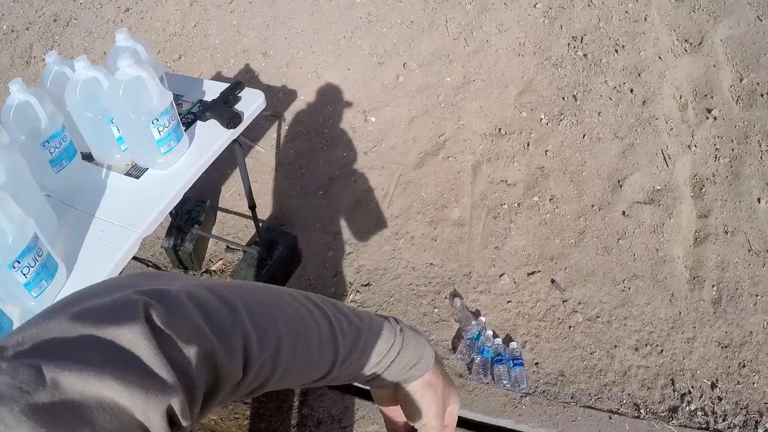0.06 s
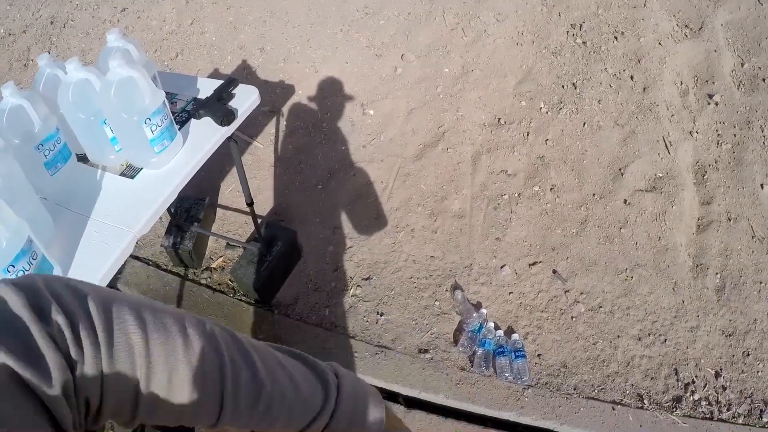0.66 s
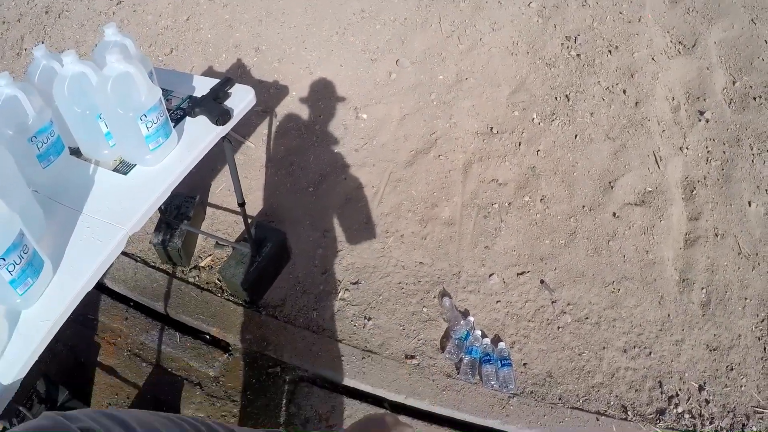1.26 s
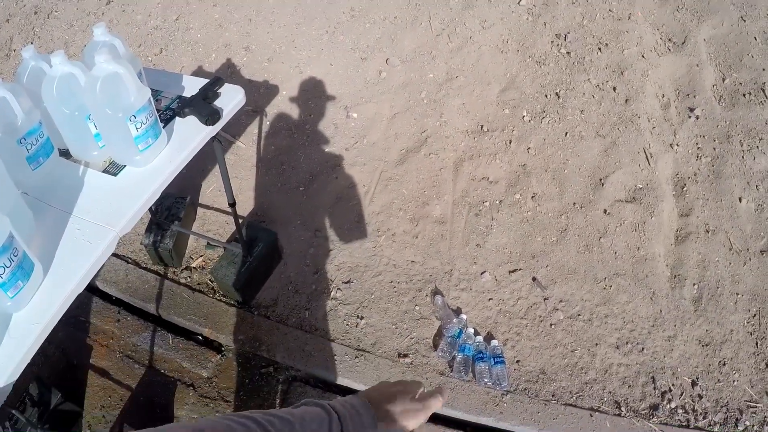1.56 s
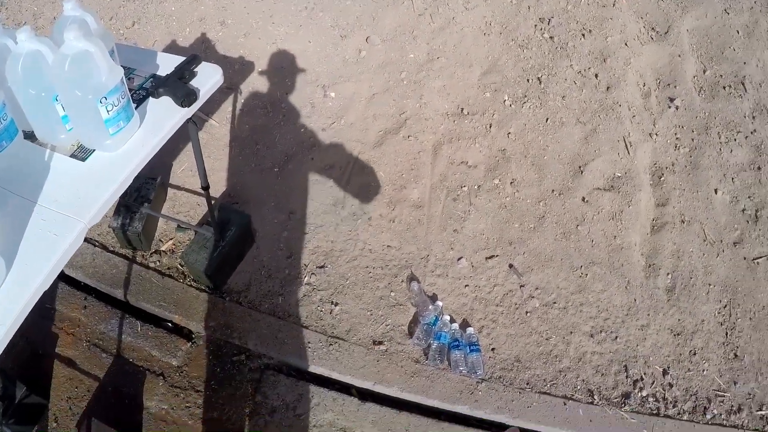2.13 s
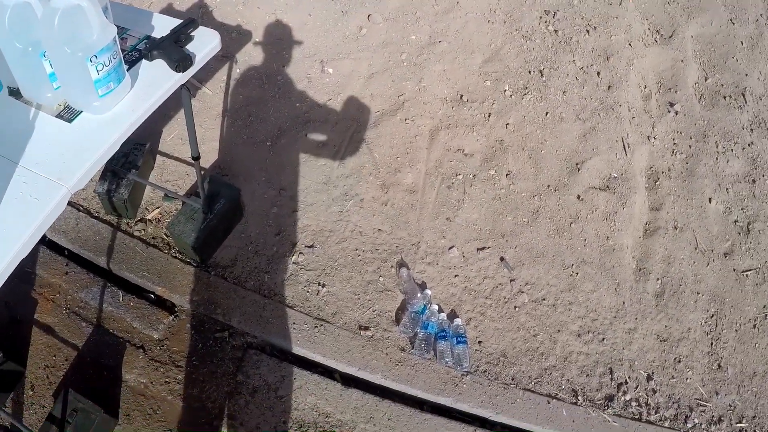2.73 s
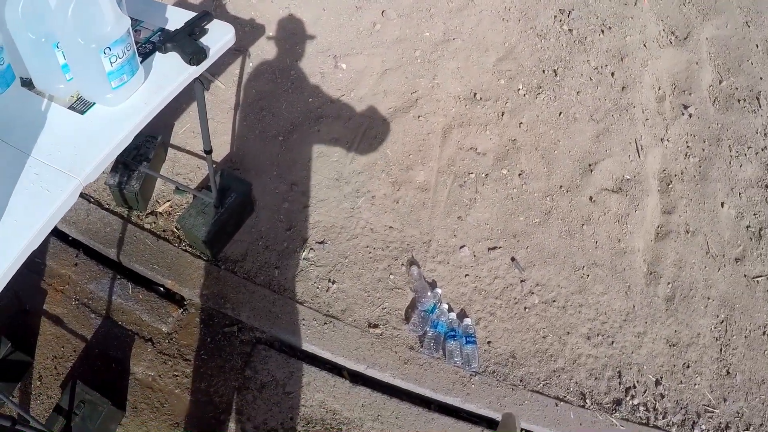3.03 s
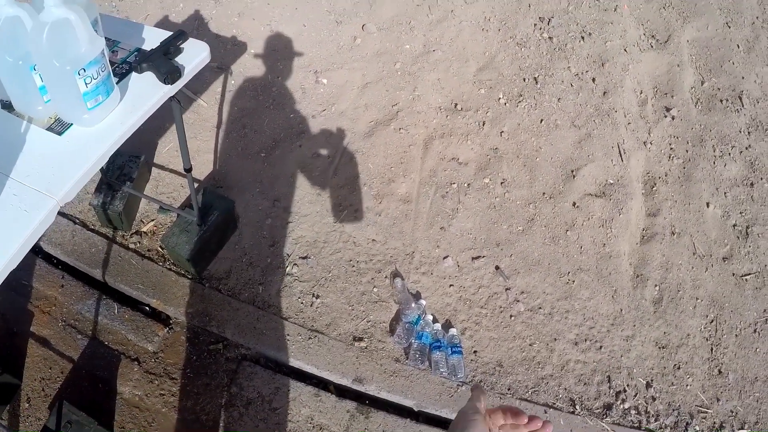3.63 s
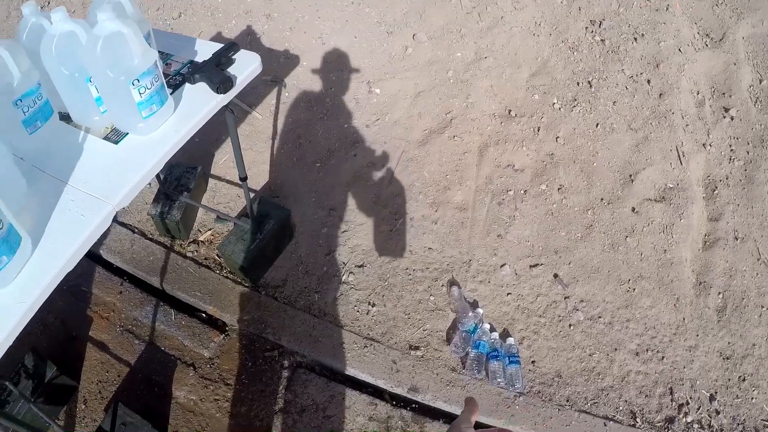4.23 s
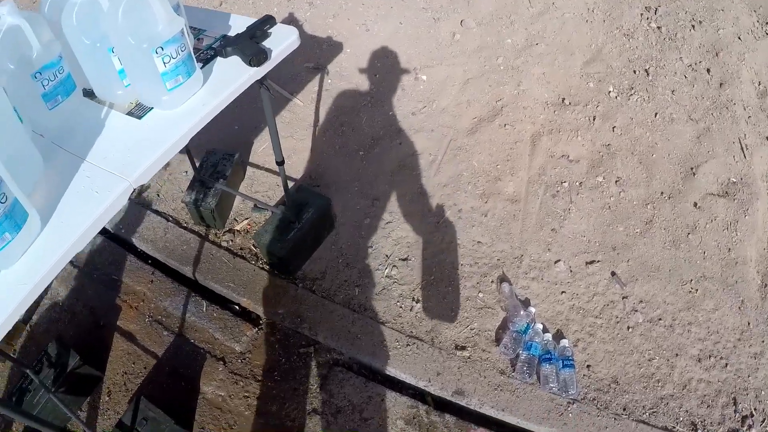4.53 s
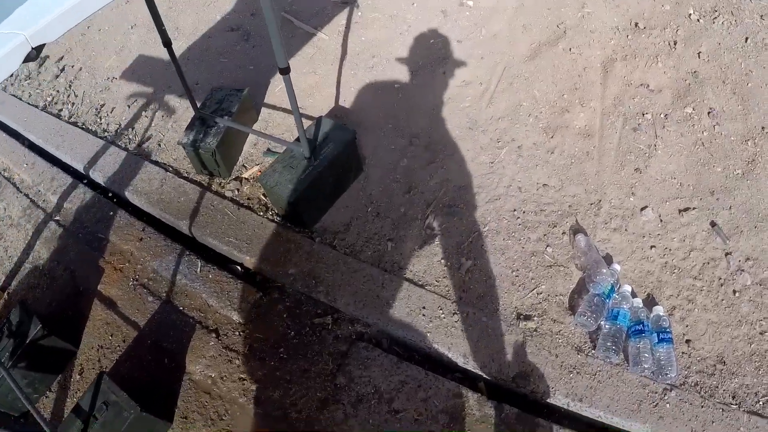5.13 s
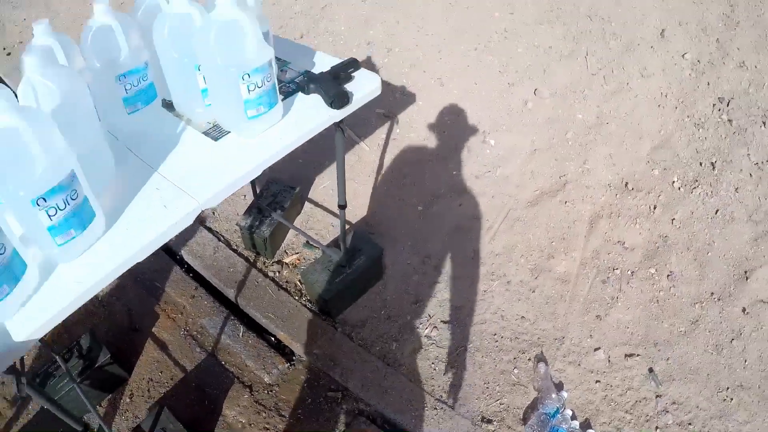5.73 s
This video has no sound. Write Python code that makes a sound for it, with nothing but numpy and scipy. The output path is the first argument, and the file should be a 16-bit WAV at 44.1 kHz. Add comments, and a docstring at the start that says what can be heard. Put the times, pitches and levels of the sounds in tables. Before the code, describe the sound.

A thin plastic water jug crackles, knocks and sloshes as it is handled, with two short splashes over a faint engine hum.

```python
"""Emptying a plastic jug

A thin plastic water jug is picked up, tipped out and put down outdoors, close to a body-worn microphone.
Its walls knock under blows and crackle as creases snap through. Air pockets ring in the last water as it
sloshes in the hollow body and splashes out. Sleeves rustle, grit crunches, an engine idles some way off."""
import sys
import numpy as np
from scipy import signal
from scipy.fft import rfft, irfft, next_fast_len
from scipy.io import wavfile
from scipy.ndimage import uniform_filter1d

SR = 44100
rng = np.random.default_rng(int(sys.argv[2]) if len(sys.argv) > 2 else 0)


def store_wav(level_fs):
    """Save 16-bit WAV to argv[1]."""
    pcm = np.round(np.clip(np.atleast_2d(level_fs), -1, 1) * 32767)
    wavfile.write(sys.argv[1], SR, pcm.T.astype(np.int16))


N = 263718
TIME = np.arange(N) / SR
# air and wall modes of the jug: (pitch [Hz], level [dB], t60 [s])
JUG_MODES = [(310, -6, 0.17), (374, -7, 0.13), (453, -1.5, 0.16), (489, -4, 0.13), (620, -2, 0.11),
             (715, -9, 0.049), (965, -11, 0.09), (1127, -7, 0.046), (1350, 1, 0.032), (1575, -7, 0.048)]


def from_db(db):
    """Decibels to gain."""
    return 10 ** (np.asarray(db) / 20)


def rms_one(x):
    """Scale to rms 1."""
    return x / np.sqrt(np.mean(x ** 2) + 1e-20)


def even(x, window_s):
    """Hold the short-term rms at 1."""
    power = uniform_filter1d(x ** 2, max(int(window_s * SR), 2))
    return x / np.sqrt(np.abs(power) + 1e-12)


def automation(rows):
    """One curve per value column, drawn through timed breakpoints."""
    times, *columns = np.transpose(rows)
    return [np.interp(TIME, times, column) for column in columns]


def add(track, s, sound):
    """Mix a sound into a track at time s."""
    start = max(round(s * SR), 0)
    track[start:start + len(sound)] += sound[:len(track) - start]


def coloured(x, spectrum):
    """Shape a steady signal with an EQ curve, rolled off below its first point; rms 1."""
    hz, db = np.transpose(spectrum)
    size = next_fast_len(N)
    log_hz = np.log(np.maximum(np.fft.rfftfreq(size, 1 / SR), 1))
    low_cut = np.minimum(np.exp(log_hz) / hz[0], 1) ** 2
    eq = from_db(np.interp(log_hz, np.log(hz), db))
    return rms_one(irfft(rfft(x, size) * low_cut * eq, size)[..., :N])


def drift(per_s):
    """A random wander through points of spread 1."""
    knots = rng.standard_normal(2000)
    return np.interp(TIME * per_s, np.arange(len(knots)), knots)


def grains(per_s, spread_db):
    """Random clicks of very uneven size."""
    sizes = from_db(spread_db * np.minimum(rng.exponential(1, N), 4)) * rng.choice([-1, 1], N)
    return sizes * (rng.random(N) < per_s / SR)


def swell(rise_s, t60):
    """An envelope with a linear attack and an exponential decay."""
    t = TIME[:int((rise_s + t60) * SR)]
    return np.minimum(t / rise_s, 1) * from_db(-60 * np.maximum(t - rise_s, 0) / t60)


def ring(hz, t60, rise_cycles):
    """A damped swing at one pitch."""
    envelope = swell(rise_cycles / hz, t60)
    return envelope * np.sin(2 * np.pi * hz * TIME[:len(envelope)])


def snap(hz, rise_cycles):
    """A short packet of cycles that swells smoothly and dies."""
    rise_s = max(rise_cycles, .3) / hz
    t = TIME[:int(10 * rise_s * SR)]
    envelope = (t / rise_s * np.exp(1 - t / rise_s)) ** 2
    return envelope * np.sin(2 * np.pi * min(hz, SR / 3) * t)


def pings(count, centre_hz, spread_octaves, rise_cycles, spread_db):
    """Little rings in random bunches, each with its own pitch and size; rms 1."""
    out, duration = np.zeros(N), N / SR
    bunching_s = 0.05 * drift(per_s=11)
    for k, (when, pitch, size, length) in enumerate(rng.random((count, 4))):
        s = (k + when) / count * duration
        hz = centre_hz * 2 ** (spread_octaves * np.arcsin(2 * pitch - 1))
        ping = from_db(spread_db * size ** 2) * snap(hz, rise_cycles * (.5 + length))
        add(out, (s + bunching_s[int(s * SR)]) % duration, ping)
    return rms_one(out)


def bursts(cues, spectrum, rise_share):
    """Swells of dense tiny impacts; each attack lasts a share of its decay time."""
    crackle = even(coloured(grains(per_s=13000, spread_db=4.5), spectrum), window_s=0.004)
    level = np.zeros(N)
    for s, db, t60 in cues:
        add(level, s, from_db(db) * swell(rise_share * t60, t60))
    return crackle * level


def scatter(x, t60, low_hz, high_hz):
    """A tail of dense short echoes, near unity gain within its band."""
    envelope = swell(0.00081, t60)
    band = signal.butter(2, [low_hz, high_hz], "band", fs=SR, output="sos")
    noise = even(signal.sosfilt(band, rng.standard_normal(SR)), window_s=0.00064)
    echoes = noise[:len(envelope)] * envelope
    band_share = 2 * (high_hz - low_hz) / SR
    return signal.fftconvolve(x, echoes * np.sqrt(band_share / np.sum(echoes ** 2)))[:N]


def wall_colour(x, dip_hz=3970, dip_mix=0.31, top_hz=14000):
    """The wall radiates poorly between its two bright resonances, and its top end is soft."""
    notched = signal.lfilter(*signal.iirnotch(dip_hz, Q=7, fs=SR), x + 1e-18)
    lowpass = signal.butter(3, top_hz, fs=SR, output="sos")
    return signal.sosfilt(lowpass, dip_mix * notched + (1 - dip_mix) * x)


def movement():
    """Arms and feet move: cloth and plastic crinkle and rub, water blips faintly, grit crunches."""
    # moves of the body: (time [s], rustle level [dB], rubbing level [dB])
    moves = [(0.0, -71, -61.5), (0.77, -60.5, -56), (1.45, -66, -61.5), (1.73, -52.5, -51.5),
             (1.96, -68.5, -65), (2.22, -59.5, -59), (2.34, -53, -49), (2.56, -55.5, -54.5),
             (2.75, -56.5, -54.5), (3.01, -55.5, -51), (3.4, -61, -58), (3.78, -57, -53.5),
             (3.95, -52, -56.5), (4.1, -52.5, -55.5), (4.17, -59.5, -56.5), (4.44, -49, -57.5),
             (4.6, -56.5, -57), (4.76, -57.5, -59.5), (4.9, -57.5, -58.5), (4.97, -52, -55.5),
             (5.11, -52, -56.5), (5.38, -49.5, -53.5), (5.53, -54, -56), (5.65, -51.5, -55),
             (5.98, -52, -56.5)]
    # grit underfoot: (time [s], level [dB])
    footing = [(0.0, -77), (0.6, -65), (1.2, -70), (2.1, -79), (3.3, -82), (3.9, -73.5), (4.9, -65),
               (5.3, -60.5), (5.98, -83)]
    # bright rustle: (frequency [Hz], level [dB])
    rustle_eq = [(900, -36), (2100, -11), (3100, 1), (4000, -5), (5200, 2), (6300, -0.5), (7300, -4.5),
                 (10000, -11.5), (13000, -21), (15500, -29)]
    # dull rubbing: (frequency [Hz], level [dB])
    rubbing_eq = [(120, -8.5), (220, 8), (330, 6), (600, 2.5), (900, -1.5), (1400, -3), (2000, -14.5),
                  (3500, -18), (8000, -82)]
    rustle_db, rubbing_db = automation(moves)
    grit_db, = automation(footing)
    flutter_db = 3.7 * drift(per_s=140) + 0.53 * drift(per_s=22)
    cloth = from_db(flutter_db - 3.5) * coloured(grains(per_s=7000, spread_db=4.5), rustle_eq)
    crinkles = from_db(-8) * pings(420, centre_hz=5400, spread_octaves=0.35, rise_cycles=1.6, spread_db=12)
    grit = pings(170, centre_hz=9200, spread_octaves=0.4, rise_cycles=1.1, spread_db=20)
    shiver = from_db(1) * scatter(crinkles, t60=0.007, low_hz=2650, high_hz=8300)
    judder_db = 5.8 * np.tanh(drift(per_s=40))
    rubbing = from_db(judder_db - 3) * coloured(grains(per_s=2000, spread_db=4), rubbing_eq)
    blips = from_db(-10) * pings(380, centre_hz=850, spread_octaves=0.55, rise_cycles=1, spread_db=9)
    bright = from_db(rustle_db - 0.84) * (cloth + crinkles + shiver)
    dull = from_db(rubbing_db + 1.6) * (rubbing + blips)
    return bright + dull + from_db(grit_db + 1) * wall_colour(grit)


def engine(firing_hz=82.3):
    """A distant idle: only its lowest orders carry this far."""
    # loudness of the idle: (time [s], level [dB])
    fader = [(0.0, -55), (0.12, -52.5), (1.65, -61), (3.57, -52.5), (5.1, -52.5), (5.5, -50.5)]
    # engine orders: (multiple of the firing rate [ratio], level [dB])
    orders = [(3 / 4, -9), (0.99, 0), (2, -18.5)]
    level_db, = automation(fader)
    wavering_hz = firing_hz * (1 + 0.0019 * drift(per_s=2.68))
    phase = 2 * np.pi * np.cumsum(wavering_hz) / SR
    hum = sum(from_db(db + 0.5 * drift(per_s=7.1)) * np.sin(k * phase) for k, db in orders)
    return from_db(level_db) * np.sqrt(2) * hum


def outdoor_air():
    """A steady bed of open air, mostly low rumble."""
    # ambience: (frequency [Hz], level [dB])
    air_eq = [(20, 3.5), (40, -1), (70, 3), (120, -7), (220, -21.5), (600, -19.5), (1400, -28.5),
              (2500, -95), (6000, -38.5), (12000, -36.5), (15000, -40)]
    return from_db(-57) * coloured(rng.standard_normal(N), air_eq)


def port_hiss():
    """Each of the two microphone ports has its own faint hiss."""
    # self-noise: (frequency [Hz], level [dB])
    hiss_eq = [(100, 7.5), (1000, -3.5), (3000, -3), (6000, -4), (12000, -8.5), (14500, -10.5)]
    return from_db(-69) * coloured(rng.standard_normal((2, N)), hiss_eq)


def scuffs():
    """Hand, sleeve and ground brush in gritty strokes."""
    # strokes: (time [s], level [dB], t60 [s])
    strokes = [(0.025, -52.5, 0.073), (0.1, -59, 0.21), (0.353, -47.5, 0.058), (0.42, -56.5, 0.6),
               (1.043, -52, 0.12), (0.77, -55.5, 0.49), (1.141, -47, 0.088), (1.175, -53, 0.2),
               (2.269, -43.5, 0.074), (2.301, -47, 0.26), (2.417, -45, 0.1), (2.822, -51, 0.11),
               (2.976, -44, 0.11), (3.946, -46, 0.056), (4.01, -43, 0.047), (4.538, -47.5, 0.12),
               (4.985, -50, 0.18), (5.332, -43, 0.24), (5.539, -40, 0.45)]
    # midrange rasp: (frequency [Hz], level [dB])
    scuff_eq = [(300, -31), (650, 6), (1000, 5.5), (1400, 10), (1700, -8.5), (2200, -7), (3200, -4),
                (6000, -14), (12000, -45)]
    return bursts(strokes, scuff_eq, rise_share=0.017)


def sprays():
    """Splashing water, scraped plastic and crunching grit throw off short sprays of crackle."""
    # sprays: (time [s], level [dB], t60 [s])
    cues = [(0.026, -55, 0.042), (1.492, -41.5, 0.05), (1.609, -38.5, 0.12), (1.669, -23, 0.035),
            (2.299, -41, 0.035), (2.411, -40.5, 0.035), (2.421, -36, 0.021), (2.635, -34.5, 0.098),
            (2.81, -42.5, 0.029), (2.968, -37, 0.065), (3.0795, -35.5, 0.031), (5.332, -23.5, 0.05),
            (5.3385, -25, 0.062), (5.358, -37, 0.19), (5.409, -31.5, 0.1), (5.538, -38.5, 0.051),
            (5.558, -39.5, 0.084), (5.59, -45, 0.083), (5.613, -44, 0.038), (5.682, -42, 0.19),
            (5.712, -45, 0.083), (5.749, -41.5, 0.028), (5.948, -44.5, 0.094)]
    # bright crackle: (frequency [Hz], level [dB])
    crackle_eq = [(600, -1), (1400, -7), (2100, -10), (3000, 2), (4000, -5), (5000, 2), (6100, 0),
                  (7000, -9), (9500, -17.5), (13000, -27.5), (15500, -44)]
    return bursts(cues, crackle_eq, rise_share=0.072)


def crease_snaps(crack_hz=9200, step_s=0.0014, step_loss_db=15.5):
    """A crease snaps through with a few bright cycles and a crack, then settles in weaker, uneven steps."""
    # snaps of buckling plastic and of grit: (time [s], level [dB], pitch [Hz], attack [cycles])
    cues = [(0.253, -43.5, 5570, 1.8), (0.266, -47, 5400, 1.4), (0.289, -50, 5170, 2.8),
            (0.381, -45, 5750, 2.5), (0.42, -29, 5100, 1), (0.44, -41, 5000, 1.4), (0.516, -39, 4900, 0.88),
            (0.555, -30.5, 5230, 3.3), (0.575, -39.5, 5840, 2.4), (0.591, -26.5, 5250, 1.9),
            (0.675, -38, 4940, 0.89), (0.691, -31.5, 5260, 3.1), (0.725, -31, 4760, 1.8),
            (0.741, -27, 4300, 0.95), (0.772, -35.5, 9100, 1.5), (0.787, -34, 6000, 0.9),
            (0.85, -40, 5010, 1.3), (1.086, -39.5, 6080, 0.86), (1.1422, -37, 3830, 0.49),
            (1.1738, -27.5, 6400, 0.94), (1.477, -27, 5600, 0.92), (1.6125, -31, 3100, 1),
            (1.6245, -29.5, 5500, 1.1), (1.657, -19.5, 3420, 0.66), (1.6698, -12, 3820, 1.94),
            (1.671, -11, 6940, 1.12), (1.6712, -19.5, 10900, 1.3), (1.837, -33.5, 5800, 1.6),
            (1.911, -23.5, 4970, 1.8), (1.951, -30.5, 5930, 0.96), (2.304, -22, 6250, 0.77),
            (2.448, -28.5, 5640, 1.3), (2.452, -34.5, 3800, 1.5), (2.685, -26.5, 5500, 0.98),
            (2.751, -30, 5050, 0.41), (2.783, -27, 5600, 0.92), (2.824, -37, 3340, 1.9),
            (2.945, -28.5, 5540, 0.77), (3.013, -18.5, 4200, 0.56), (3.046, -26.5, 5330, 0.87),
            (3.081, -29, 4900, 4.3), (3.111, -35.5, 5070, 3.8), (3.146, -31.5, 4900, 2.9),
            (3.1684, -24.5, 4240, 1.65), (3.2167, -26.5, 3840, 0.45), (3.23, -38, 5050, 2.9),
            (3.353, -37.5, 4830, 1.2), (3.398, -24.5, 5630, 1.6), (3.6232, -29.5, 9100, 2.6),
            (3.623, -24, 5550, 1.8), (3.84, -22.5, 4550, 1.03), (3.903, -26, 5400, 0.56),
            (3.952, -25.5, 6100, 0.71), (4.068, -39, 5170, 1.6), (4.096, -27.5, 5100, 1.4),
            (4.105, -18, 4720, 1.28), (4.207, -35.5, 7590, 1.3), (4.27, -41, 3550, 1.6),
            (4.291, -32.5, 3240, 0.87), (4.3312, -26.5, 2800, 1), (4.386, -19.5, 3450, 1.3),
            (4.407, -34, 5200, 1.1), (4.424, -33, 3800, 1.2), (4.4434, -23.5, 3480, 0.44),
            (4.458, -36, 3870, 1.1), (4.476, -27.5, 6840, 1.4), (4.496, -34, 6200, 1.8),
            (4.539, -33.5, 6400, 2.9), (4.613, -35, 5340, 1.2), (4.637, -29.5, 3560, 0.63),
            (4.645, -28, 6800, 1.3), (4.68, -36.5, 6700, 2.4), (4.698, -39.5, 3140, 2.8),
            (4.738, -36.5, 6740, 2.1), (4.787, -34.5, 5050, 1.7), (4.86, -34.5, 5930, 1.5),
            (4.894, -34, 6500, 2.7), (4.934, -31.5, 6850, 1.8), (4.96, -28, 5970, 1.9),
            (4.963, -29.5, 6050, 1.8), (5.005, -26, 4770, 1.06), (5.031, -27, 5200, 1.4),
            (5.044, -24, 4940, 1.4), (5.066, -26, 5400, 1.1), (5.086, -36, 5040, 1.4),
            (5.107, -34.5, 5660, 1.5), (5.182, -26.5, 4950, 0.96), (5.224, -37, 5060, 1.6),
            (5.248, -33, 5560, 2), (5.291, -24.5, 4660, 0.83), (5.3403, -14, 5100, 2.5),
            (5.344, -15, 4960, 2.5), (5.364, -24, 3000, 1), (5.368, -30, 5000, 2.4), (5.388, -34, 5440, 3),
            (5.397, -22, 5200, 2.8), (5.402, -31, 5500, 2.2), (5.4221, -22, 5270, 2.1),
            (5.427, -22.5, 3150, 1.4), (5.4383, -27, 5670, 1.8), (5.464, -33.5, 5070, 2),
            (5.5592, -34, 2850, 1.8), (5.5925, -32, 5000, 1.8), (5.6142, -30.5, 3600, 2.3),
            (5.7123, -30.5, 3900, 2.3), (5.7497, -30.5, 4030, 2), (5.819, -36, 5510, 2.4),
            (5.8515, -30.5, 7000, 1.2), (5.856, -25.5, 7300, 1.5), (5.869, -24, 4700, 1.24),
            (5.903, -33, 4000, 1.8), (5.955, -29.5, 3750, 2.1)]
    out = np.zeros(N)
    for (s, db, hz, cycles), steps in zip(cues, rng.random((len(cues), 3, 2))):
        add(out, s, from_db(db) * snap(hz, cycles))
        add(out, s, from_db(db - 15.5) / cycles * snap(hz=3430, rise_cycles=1.55))
        crack_db = db - 7.5 + 4.5 * np.log2(hz / crack_hz)  # small, high creases crack more brightly
        add(out, s, from_db(crack_db) * snap(crack_hz, rise_cycles=1.1))
        for k, (wait, pitch) in enumerate(steps):
            step = snap(hz * 2 ** (0.9 * (pitch - .5)), cycles)
            add(out, s + step_s * (k + 0.35 + wait), from_db(db - 4 - step_loss_db * k) * step)
    return wall_colour(out + from_db(-9) * scatter(out, t60=0.051, low_hz=2580, high_hz=11900))


def knocks(ring_cycles=12.2, light_blow_db=-27.5, db_per_halving=41, overtone_ratio=2.1):
    """The wall swings with one overtone and the jug shudders after it; harder blows dent and die sooner."""
    # blows from the hand, the ground or the water inside: (time [s], level [dB], pitch [Hz])
    blows = [(1.1437, -30, 620), (1.1745, -40, 1410), (1.192, -43.5, 600), (1.2413, -45, 900),
             (1.501, -36, 1190), (1.612, -28, 676), (1.6553, -12, 1140), (1.656, -21, 760),
             (1.689, -23, 440), (1.693, -25, 428), (1.696, -22, 620), (1.7, -19, 980), (1.705, -22.5, 1310),
             (1.721, -21.5, 442), (1.757, -31, 360), (1.761, -28, 470), (1.781, -39, 1320),
             (1.808, -36, 420), (2.303, -33.5, 1210), (2.632, -28, 1220), (2.6363, -18.5, 1410),
             (2.639, -29, 700), (2.643, -19, 353), (2.729, -37.5, 397), (3.031, -40, 440),
             (3.085, -34, 813), (3.6784, -23.5, 596), (3.687, -25.5, 317), (3.698, -30.5, 930),
             (3.702, -29, 317), (3.72, -40.5, 160), (3.774, -45, 167), (3.826, -42, 340), (4.237, -45, 500),
             (4.289, -48, 444), (4.459, -49, 446), (5.338, -29, 564), (5.349, -21, 440),
             (5.358, -26.5, 676), (5.368, -24, 920), (5.383, -30, 570), (5.395, -24.5, 322),
             (5.405, -24, 340), (5.433, -33, 653), (5.436, -33, 234), (5.5387, -23.5, 1620),
             (5.5395, -30, 640), (5.55, -23.5, 740)]
    out = np.zeros(N)
    for s, db, hz in blows:
        t60 = ring_cycles / hz * 2 ** ((light_blow_db - db) / db_per_halving)
        add(out, s, from_db(db) * ring(hz, t60, rise_cycles=0.77))
        add(out, s, from_db(db - 14) * ring(hz * overtone_ratio, t60, rise_cycles=0.7))
    return out + from_db(-5) * scatter(out, t60=0.069, low_hz=238, high_hz=1660)


def hollow_body(x):
    """The jug resonates in its air and wall modes."""
    out = np.zeros(N)
    for hz, db, t60 in JUG_MODES:
        radius = from_db(-60 / (t60 * SR))
        poles = [1, -2 * radius * np.cos(2 * np.pi * hz / SR), radius ** 2]
        gain = (1 - radius ** 2) / 2  # unity at the peak
        out += from_db(db) * signal.lfilter([gain, 0, -gain], poles, x + 1e-18)
    return out


def sloshes(pockets=300, ring_cycles=15.7, spread_octaves=0.684, sink_s=0.032, settled_hz=391):
    """Each slosh is a cloud of air pockets: small ones ring first, large ones follow."""
    # water thrown about inside: (time [s], level [dB], starting pitch [Hz], t60 [s])
    cues = [(1.611, -39.5, 544, 0.26), (1.655, -36.5, 1010, 0.67), (1.691, -23.5, 625, 0.3),
            (2.268, -49.5, 720, 0.79), (2.642, -37.5, 463, 0.21), (2.978, -39.5, 790, 0.15),
            (3.081, -39.5, 640, 0.12), (3.171, -50, 403, 0.39), (4.449, -53.5, 480, 0.88),
            (4.57, -52, 670, 0.48), (4.675, -49.5, 625, 0.12), (4.78, -54, 890, 0.54),
            (4.865, -47.5, 647, 0.1), (3.674, -34.5, 824, 0.29), (5.345, -29, 526, 0.18),
            (5.369, -31.5, 580, 0.15), (5.417, -39, 477, 0.09)]
    settled_spread = 0.54  # share of the pitch spread left once the water settles
    out = np.zeros(N)
    for s, db, first_hz, t60 in cues:
        envelope = swell(0.0088, t60)
        cloud = np.zeros(SR)
        births = rng.random(pockets) ** 2 / 2
        pitches, strengths = rng.standard_normal((2, pockets))
        for born, pitch, strength in zip(births, pitches, strengths):
            fresh = np.exp(-born / sink_s)
            centre_hz = settled_hz + (first_hz - settled_hz) * fresh
            octaves = spread_octaves * (settled_spread + (1 - settled_spread) * fresh)
            hz = centre_hz * 2 ** (octaves * 2 * np.tanh(pitch / 2))
            add(cloud, born, strength * ring(hz, ring_cycles / hz, rise_cycles=0.51))
        add(out, s, from_db(db) * even(cloud, window_s=0.0039)[:len(envelope)] * envelope)
    return signal.sosfilt(signal.butter(2, [220, 1600], "band", fs=SR, output="sos"), out)


def glugs_and_hum():
    """Short dying tones: rising glugs of water, and the jug's near-steady hum after the big slosh."""
    # dying tones: (time [s], level [dB], starting pitch [Hz], t60 [s], glide [octaves/s])
    tones = [(1.615, -38.5, 345, 0.19, 3), (1.76, -32, 284, 0.13, 1), (1.8, -40.5, 450, 0.1, 1),
             (1.836, -40.5, 376, 0.14, 0), (1.868, -44.5, 291, 0.17, 1), (2.655, -37, 318, 0.19, 7.5),
             (2.825, -39.5, 233, 0.12, 2), (3.089, -33.5, 740, 0.055, 2.5), (3.108, -38, 308, 0.087, 3.5),
             (3.176, -41, 388, 0.064, 2.5), (3.205, -42, 300.3, 0.25, 3), (3.945, -44, 360, 0.11, 5),
             (4.012, -41, 420, 0.054, 6), (4.237, -40, 310, 0.025, 6.5), (4.352, -40, 296, 0.062, 7),
             (4.495, -45.5, 586, 0.045, 5.7)]
    out = np.zeros(N)
    for s, db, first_hz, t60, octaves_per_s in tones:
        envelope = swell(1.4 / first_hz, t60)
        hz = first_hz * 2 ** (octaves_per_s * TIME[:len(envelope)])
        add(out, s, from_db(db) * envelope * np.sin(2 * np.pi * np.cumsum(hz) / SR))
    return out + from_db(-8) * scatter(out, t60=0.081, low_hz=239, high_hz=1180)


def boom(at_s=1.688, rise_s=0.0092, db_per_octave=-4):
    """Held free, the jug booms after a soft, heavy jolt: its modes ring twice as long, low ones favoured."""
    out = np.zeros(N)
    lowest_hz = JUG_MODES[0][0]
    for hz, db, t60 in JUG_MODES:
        tilt_db = db_per_octave * np.log2(hz / lowest_hz)
        add(out, at_s, from_db(db + tilt_db - 29) * ring(hz, 2 * t60, rise_cycles=rise_s * hz))
    return out


def mount_thumps(reference_hz=50, reference_t60=0.097):
    """Dull jolts reach the microphone through its mount; damping grows with the square of the pitch."""
    # jolts: (time [s], level [dB], pitch [Hz])
    jolts = [(2.731, -32.5, 67), (3.034, -33, 66), (5.538, -26, 90), (5.665, -32.5, 37.8),
             (5.736, -29.5, 43.3), (5.893, -33.5, 44.6), (5.944, -37.5, 48)]
    out = np.zeros(N)
    for s, db, hz in jolts:
        t60 = reference_t60 * (reference_hz / hz) ** 2
        add(out, s, from_db(db) * ring(hz, t60, rise_cycles=0.28))
    return out


def scene():
    """The direct sound sits far to the right; each port has its own hiss and echoes of nearby surfaces."""
    inside = knocks() + sloshes()
    body = from_db(-1.5) * inside + from_db(-0.5) * hollow_body(inside)
    jug = body + boom() + glugs_and_hum() + crease_snaps()
    near = jug + sprays() + scuffs() + movement()
    far = engine() + outdoor_air()
    direct = near + far + mount_thumps()
    echoes = np.array([scatter(near, t60=0.084, low_hz=1260, high_hz=13900) for port in range(2)])
    return from_db([[-11], [4.7]]) * direct + from_db([[-14], [-18]]) * echoes + port_hiss()


def record(dry):
    """A steep low-pass cuts off the very top."""
    cutoff_hz = 15200
    return signal.sosfilt(signal.ellip(10, .2, 90, cutoff_hz, fs=SR, output="sos"), dry)


dry = scene()
out = record(dry)
store_wav(out)
```